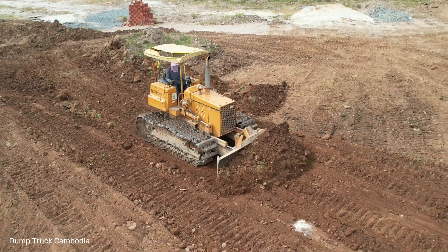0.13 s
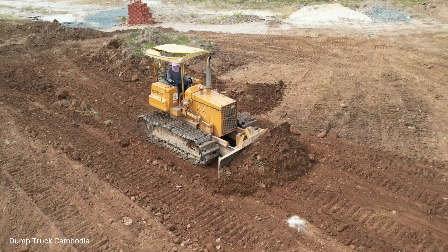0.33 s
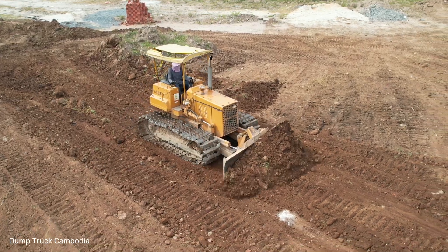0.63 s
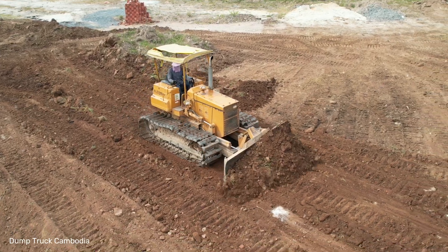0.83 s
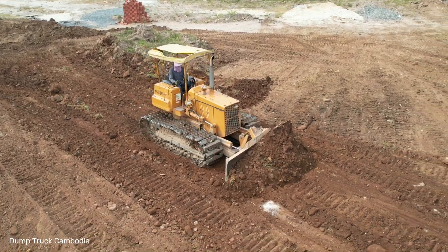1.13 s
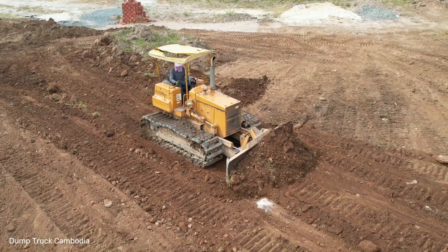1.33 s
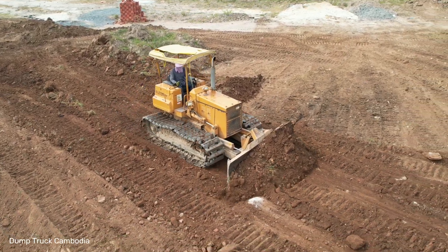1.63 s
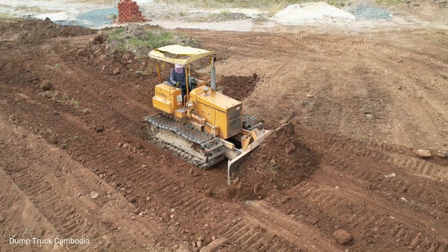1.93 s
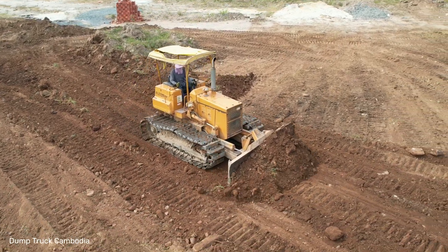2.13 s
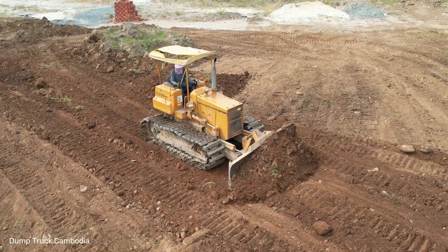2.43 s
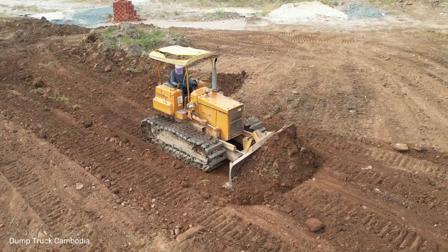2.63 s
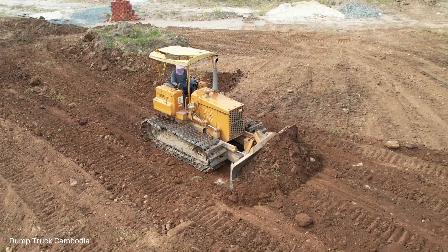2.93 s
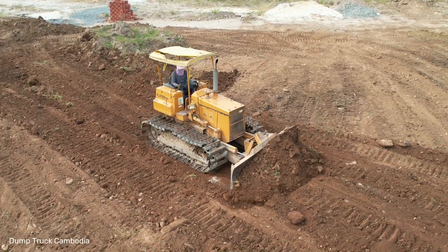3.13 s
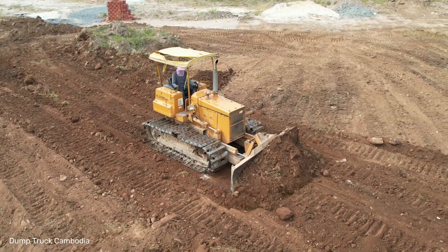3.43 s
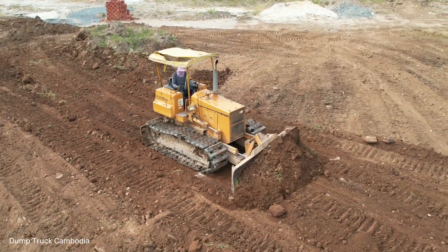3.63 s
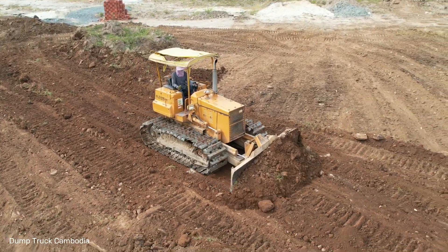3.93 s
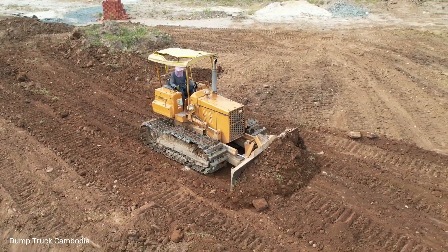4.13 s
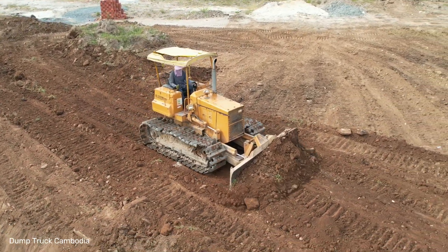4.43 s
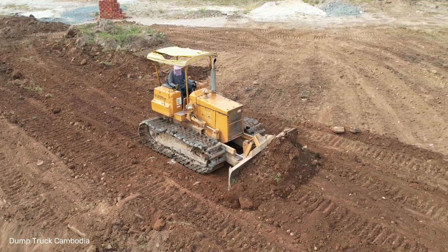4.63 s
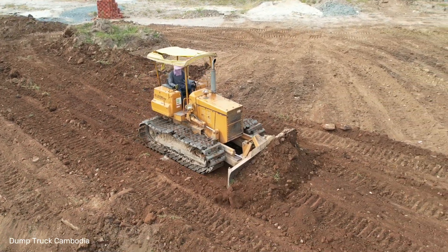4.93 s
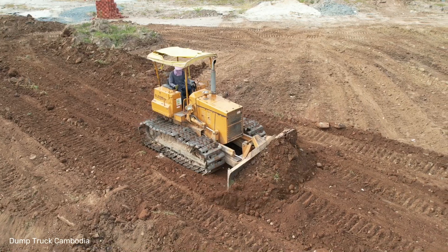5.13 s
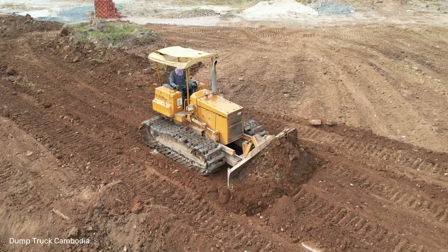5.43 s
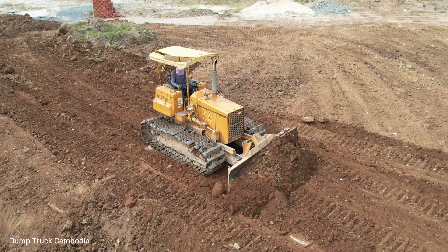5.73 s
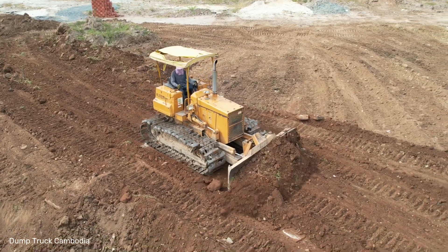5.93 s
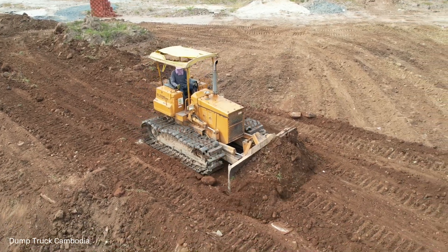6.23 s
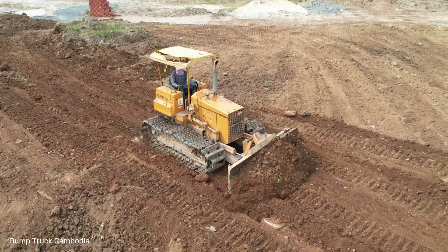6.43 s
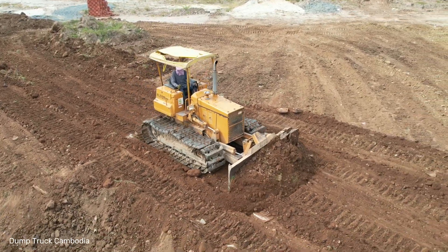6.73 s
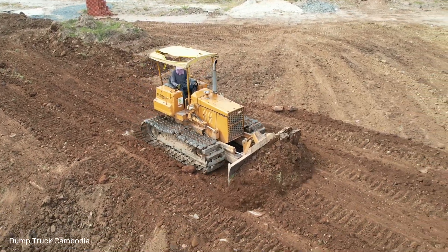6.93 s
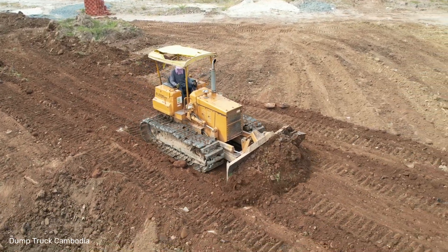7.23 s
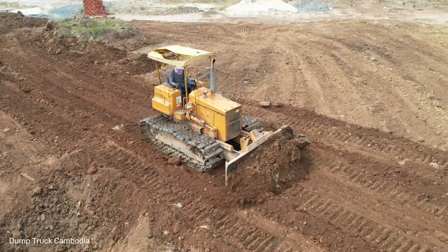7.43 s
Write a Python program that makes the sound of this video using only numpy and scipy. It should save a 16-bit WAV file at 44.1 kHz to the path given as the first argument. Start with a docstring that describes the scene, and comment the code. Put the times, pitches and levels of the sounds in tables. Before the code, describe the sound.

A bulldozer's diesel engine booms steadily under load while its steel tracks clank link by link, squeak now and then, and grind over soil outdoors.

```python
"""A four-cylinder diesel booms at the stack as a small crawler bulldozer pushes soil over open ground.
The boom (crankshaft orders) swells as the blade bites; with less load the engine runs lighter and faster.
Steel tracks clank link by link (ringing modes and grit noise) and dry pins squeak (wavering tones).
One roller, the hull and a hollow hum ring out; injectors rattle, soil grinds and stones crack.
One microphone channel takes it all in, with a faint tail from hull and ground behind the squeaks."""
import sys
import numpy as np
from scipy import signal
from scipy.fft import rfft, irfft, next_fast_len
from scipy.io import wavfile
from scipy.ndimage import map_coordinates

SR = 44100
rng = np.random.default_rng(int(sys.argv[2]) if len(sys.argv) > 2 else 0)


def master(y):
    """Save y as 16-bit WAV."""
    cut = np.clip(np.atleast_2d(y).T, -1, 1)
    pcm = np.round(cut * 32767)  # scale
    wavfile.write(sys.argv[1], SR, pcm.astype(np.int16))


N = 333837

# links of the two tracks slapping down, unevenly as the slack shifts:
# (time [s], level [dB], rise [s])
LINK_CLANKS = [(0.059, -39.5, .015), (.225, -40.5, .02), (.385, -39.5, .025), (.572, -39, .025),
               (0.711, -35, 0.0049), (.915, -41, .008), (1.087, -38, 0.0069), (1.268, -42.5, .01),
               (1.45, -43, .02), (1.62, -34.5, .014), (1.82, -39.5, .02), (2.137, -42, .01),
               (2.216, -44, .02), (2.499, -41.5, .02), (2.622, -40, .012), (2.803, -38, .025),
               (2.861, -40.5, .015), (2.961, -42, .01), (3.125, -44, .012), (3.68, -42.5, .015),
               (4.69, -40, .04), (4.913, -45.5, .006), (5.025, -39, .02), (5.145, -39, .03),
               (5.236, -39, .03), (5.402, -38.5, .02), (5.529, -38, .035), (5.684, -34, .003),
               (5.845, -38, .02), (5.897, -37.5, .015), (6.02, -41, .015), (6.106, -36.3, .003),
               (6.15, -39.5, .015), (6.298, -32.5, 0.0078), (6.59, -34, .015), (6.617, -35, .005),
               (6.855, -39, .015), (6.895, -38, .008), (7.004, -39.5, .003), (7.189, -39.5, .02),
               (7.425, -43, .02)]
# what a track shoe rings with: (frequency [Hz], level [dB], t60 [s])
SHOE_MODES = [(627.6, -5, 0.47), (966, -1.5, 0.35), (1396, -0.5, 0.62), (1518, -5.5, 0.11),
              (1805, -5, 0.26), (2420, -20.5, 0.21), (3620, -15, 0.2)]
# loose pins and bushings jingle: level of the steady bed, and level against each clank
JINGLE_DB, JINGLE_CLANK_DB = -49, -4


def amp(db):
    """Decibels to gain."""
    return 10 ** (np.asarray(db) / 20)


def unit(x):
    """x at rms 1."""
    return x / np.sqrt(np.mean(x ** 2) + 1e-20)


def curves(rows):
    """One value per sample for each column after the time."""
    s, *cols = np.transpose(rows)
    return [np.interp(np.arange(N) / SR, s, c) for c in cols]


def wobble(rate, size=N):
    """A smooth random curve, rate knots a second."""
    knots = rng.standard_normal(int(size * rate / SR) + 4)
    return map_coordinates(knots, [np.arange(size) * rate / SR])


def coloured(x, points):
    """x through a causal body with this (Hz, dB) response; white noise keeps its power."""
    m = next_fast_len(N + SR)
    hz, db = np.transpose(points)
    bins_hz = np.fft.rfftfreq(m, 1 / SR)
    gain = unit(amp(np.interp(np.log(bins_hz + 1), np.log(hz), db)))
    # folding the cepstrum makes the response minimum phase
    cepstrum = irfft(np.log(np.maximum(gain, 1e-6)), m)
    cepstrum[1:m // 2] *= 2
    cepstrum[m // 2 + 1:] = 0
    response = np.exp(rfft(cepstrum))
    return irfft(rfft(x, m) * response, m)[:N]


def add(track, s, sound):
    """Mix a sound into the track at time s."""
    start = max(round(s * SR), 0)
    part = track[start:start + len(sound)]
    part += sound[:len(part)]


def grit(rate, spread_db, t60):
    """Noise of rms 1 made of tiny contacts, rate a second, each starting at once and dying away."""
    when, size = rng.random((int(rate * N / SR), 2)).T
    power = amp(-spread_db * np.log(np.maximum(size, .01))) ** 2
    contacts = np.bincount((when * N).astype(int), power, N)
    decay = amp(-60 / (t60 * SR)) ** 2
    fading = signal.lfilter([1], [1, -decay], contacts)
    return unit(rng.standard_normal(N) * np.sqrt(fading))


def pings(rate, t60, spread_db, detune):
    """Small steel contacts at rms 1: each briefly rings one mode of a shoe, a little off pitch."""
    t = np.arange(SR // 20) / SR
    when, which, size, off = rng.random((int(rate * N / SR), 4)).T
    hz, db, _ = np.array(SHOE_MODES)[(which * len(SHOE_MODES)).astype(int)].T
    hz = hz * (1 + detune * (2 * off - 1))
    gain = amp(db - spread_db * np.log(np.maximum(size, .03)))
    grains = gain[:, None] * np.sin(2 * np.pi * hz[:, None] * t) * amp(-60 * t / t60)
    at = (when * N).astype(int)[:, None] + np.arange(len(t))
    return unit(np.bincount(at.ravel(), grains.ravel(), N)[:N])


def firing_rate():
    """Firing rate in Hz at each sample: the engine sags as the blade bites."""
    # engine speed: (time [s], firing rate [Hz])
    engine_speed = [(0, 66.4), (.5, 66.2), (.82, 63.96), (1.6, 63.37), (1.9, 67.25), (2.12, 65.67),
                    (2.39, 69.06), (2.48, 67.78), (3.2, 67.12), (3.88, 65.66), (3.98, 68.9), (4.4, 69.94),
                    (5.08, 65.87), (5.3, 69.77), (5.68, 68.75), (6.2, 68.54), (7.07, 69.1), (7.16, 67.4),
                    (7.35, 68.6)]
    firing_hz, = curves(engine_speed)
    return firing_hz


def crank():
    """Crankshaft turns so far: four cylinders fire twice a turn, never quite evenly."""
    return np.cumsum(firing_rate() / 2) / SR + 0.0033 * wobble(30)


def load():
    """Engine load, 0 free to 1 full: the governor lets the speed sag in step with it."""
    free_hz, full_sag_hz = 70, 6.5
    return np.maximum((free_hz - firing_rate()) / full_sag_hz, .01)


def exhaust(turns):
    """Firing pulses boom at the stack; their uneven sizes and gas turbulence burble in the muffler."""
    # overtones of the boom: (crankshaft order [multiple], level against the boom [dB])
    boom_overtones = [(5, -29), (6, -13.5), (10, -29), (14.4, -40.5)]
    # orders of the crankshaft and its geared drives, at any load: (order [multiple], level [dB])
    shake_orders = [(1, -37.5), (3, -48.5), (4.7, -47)]
    # exhaust pipe and muffler: (frequency [Hz], response [dB per Hz])
    muffler_body = [(12, -36), (24, -2.5), (36, -4.5), (50, 4.5), (80, 0), (115, -3), (165, -4.5),
                    (210, -7.5), (290, -11.5), (400, -24.5), (700, -44.5), (2000, -96.5)]
    # strength of the gas turbulence in the muffler: (time [s], level [dB])
    burble_level = [(0, -31.5), (.6, -30.5), (.8, -34.5), (2.4, -32.5), (3.9, -33.3), (4.4, -36.5),
                    (5.22, -30.5), (5.45, -31), (7.05, -30.5), (7.23, -28.5), (7.57, -30)]
    # the boom's ceiling, and how quickly rising load brings it there
    ceiling_db, growth = -21, 1.12
    # the drone with no load, and its rise at full load
    drone_free_db, drone_load_db = -37, 7

    def tone(order):
        """One crankshaft order at rms 1."""
        return -np.sqrt(2) * np.cos(2 * np.pi * order * turns)

    effort = load()
    boom_db = ceiling_db + 20 * np.log10(np.tanh(growth * effort))
    # a heavier load steepens each pulse, so the overtones grow fastest
    edge = amp(.5 * (boom_db - boom_db.max()))
    overtones = np.zeros(N)
    for order, db in boom_overtones:
        # the high overtones come and go most
        level = amp(db + .2 * order * wobble(3.5))
        # the pipe delays each overtone by a different part of a cycle
        cycles = order * turns + rng.random()
        overtones += level * np.sqrt(2) * np.sin(2 * np.pi * cycles)
    boom = amp(boom_db + .5 * wobble(20)) * (tone(2) + edge * overtones)

    drone_db = drone_free_db + drone_load_db * effort
    drone = amp(drone_db + 0.3 * wobble(10)) * tone(4)
    shake = sum(amp(db + 2.5 * wobble(8.5)) * tone(order) for order, db in shake_orders)

    # turbulence surges once per firing
    puffs = unit(rng.standard_normal(N) * amp(3.1 * np.cos(4 * np.pi * turns)))
    burble_db, = curves(burble_level)
    burble = amp(burble_db + wobble(10)) * coloured(puffs, muffler_body)
    return boom + drone + shake + burble


def halt():
    """How far the machine has slowed, 0 crawling to 1 at the depth of the pause between two crawls."""
    start_s, end_s = 3.804, 5.093
    progress = np.interp(np.arange(N) / SR, (start_s, end_s), [0, 1])
    return np.sin(np.pi * progress)


def rattle(turns):
    """Injectors and valves knock in step with the crankshaft and ring in the hull; loose steel jingles."""
    # engine block and hull: (frequency [Hz], response [dB per Hz])
    hull_body = [(150, -13.5), (420, -1), (700, 4.5), (1020, -2), (1160, -7.5), (1300, 6), (1400, 3.5),
                 (1500, 5), (1680, -2), (2400, -4.5), (2850, -20), (3700, -13.5), (4250, -19),
                 (4650, -29.5), (6000, -29), (9500, -39.5), (15500, -52.5)]
    crawl_db, pause_dip_db = -42.5, -5
    dip_db = pause_dip_db * halt()
    # four strokes a turn, of uneven strength
    strokes = np.diff(np.floor(4 * turns), prepend=0)
    knock = unit(strokes * amp(2.5 * rng.standard_normal(N)))
    chatter = unit(grit(rate=650, spread_db=1.4, t60=.04) + amp(-9) * knock)
    # the jingle sinks twice as many dB in the pause
    jingle = amp(JINGLE_DB + 2 * dip_db) * pings(rate=420, t60=.04, spread_db=2, detune=.07)
    return amp(crawl_db + dip_db + wobble(20)) * coloured(chatter, hull_body) + jingle


def tracks():
    """Each link grinds down onto the ground, rings, and sets its neighbours jostling."""
    # track chain and rollers: (frequency [Hz], response [dB per Hz])
    steel_body = [(200, -26), (450, -4), (680, -16), (980, 3), (1160, -2), (1400, 11.5), (1700, 0),
                  (2450, 2), (2900, -16), (3900, -9.5), (4900, -31), (9000, -39), (11000, -53.5),
                  (15500, -51.5)]
    jostle_t60 = .21  # s
    t = np.arange(SR // 2) / SR
    power, ring = np.zeros(N), np.zeros(N)
    for s, db, rise_s in LINK_CLANKS:
        # the slack takes up just before the blow
        rise = np.minimum(t / rise_s, 1) ** 2
        after = np.maximum(t - rise_s, 0)
        start = s - .7 * rise_s
        add(power, start, (rise * amp(db - 60 * after / jostle_t60)) ** 2)
        for hz, mode_db, t60 in SHOE_MODES:
            # no two shoes are quite alike
            strength, detune, phase = rng.standard_normal(3)
            mode = np.sin(2 * np.pi * (hz * (1 + 0.03 * detune) * t + phase))
            # the ring lies 8.5 dB under the blow
            level_db = db - 8.5 + mode_db + 2 * strength
            add(ring, start, rise * amp(level_db - 60 * after / t60) * mode)
    blows = np.sqrt(power)
    jostle = amp(JINGLE_CLANK_DB) * blows * pings(rate=420, t60=.035, spread_db=2, detune=.09)
    clank = coloured(blows * grit(rate=900, spread_db=1.4, t60=.025), steel_body)
    return ring + jostle + clank


def squeaks():
    """A dry pin sticks and slips on one resonance: a wavering tone, hoarse when slips fall out of step."""
    # a brief ring of a roller at the start, then squeals and groans of dry track pins: # (middle [s], length
    # [s], pitch [Hz], level [dB], roughness [0-1])
    pin_squeaks = [(.005, 0.024, 1730, -41, .05), (0.109, 0.067, 8540, -56, 0.25),
                   (0.312, 0.11, 5280, -59.5, 0.2), (0.5, 0.19, 5140, -60, 0.45),
                   (1.835, 0.075, 3440, -49.5, 0.1), (2.635, 0.13, 5060, -52.5, 0.24),
                   (2.736, 0.055, 8640, -59.5, 0.29), (2.807, 0.072, 3970, -44, 0.24),
                   (2.862, 0.081, 4090, -42, 0.4), (2.911, 0.11, 3927, -40.5, 0.9),
                   (3.89, 0.086, 6120, -55.5, 0.65), (5.299, 0.056, 5160, -53.5, 0.54),
                   (5.479, 0.027, 5234, -49, 0.2), (5.768, 0.059, 5000, -63, 0.4),
                   (5.91, 0.089, 6220, -51, 0.57), (5.933, 0.032, 5167, -48.5, 0),
                   (6.242, 0.062, 5000, -49, 0.2), (6.375, .05, 4950, -61, .4),
                   (6.459, 0.068, 6230, -48, 0.2), (6.545, 0.1, 4850, -59.5, .6),
                   (6.621, 0.13, 3900, -52, 0.84), (7.002, .3, 1010, -45, 0.87),
                   (7.115, 0.1, 6640, -51.5, 1), (7.44, .25, 1000, -47.5, 1)]
    out = np.zeros(N)
    for s, length, hz, db, rough in pin_squeaks:
        size = int(max(length, .02) * SR)
        waver = .006 * wobble(45, size) + .012 * rough * wobble(200, size)
        phase = 2 * np.pi * np.cumsum(hz * (1 + waver)) / SR
        width_hz = .15 * hz
        slips = (wobble(width_hz, size) + 1j * wobble(width_hz, size)) / np.sqrt(2)
        share = np.clip(rough, 0, 1)
        voice = (np.sqrt(1 - share ** 2) + share * slips) * np.exp(1j * phase)
        swell = signal.windows.tukey(size, .85) * amp(db + 2 * wobble(150, size))
        # the steel radiates less and less of the octave as the pitch climbs
        octave = amp(-18) / (1 + (hz / 5500) ** 12) * voice ** 2 / abs(voice)
        add(out, s - length / 2, swell * (voice + octave).real * np.sqrt(2))
    return out


def scattered(x, t60, db):
    """x with the faint tail that the hull and the rough ground throw back."""
    t = np.arange(SR // 2) / SR
    tail = rng.standard_normal(len(t)) * amp(-60 * t / t60)
    return x + amp(db) * signal.fftconvolve(x, tail / np.linalg.norm(tail))[:N]


def note(s, hz, db, rise_s, t60):
    """One resonance of the machine swells and rings out."""
    t = np.arange(SR) / SR
    swell = np.minimum(t / rise_s, 1) ** 2 * amp(db - 60 * np.maximum(t - rise_s, 0) / t60)
    out = np.zeros(N)
    add(out, s, swell * np.sin(2 * np.pi * hz * t + .2 * wobble(150, len(t))))
    return out


def whine():
    """A gear mesh in the drive, geared to the engine speed, sings briefly as the load comes off."""
    # (time [s], level [dB])
    whine_db, = curves([(3.6, -80), (3.95, -48), (4.15, -47), (4.3, -60), (5, -72)])
    mesh_hz = 21.5 * firing_rate()
    mesh = np.sin(2 * np.pi * np.cumsum(mesh_hz) / SR + 0.2 * wobble(60))
    return amp(whine_db) * mesh


def pressing():
    """Near 1 while a link presses into the soil, 0 between links."""
    lag_s, press_s = 0.01, 0.093  # lag of the press's middle behind the clank, and its length
    times = np.array(LINK_CLANKS)[:, 0] + lag_s
    landed = np.bincount((times * SR).astype(int), minlength=N)[:N]
    press = signal.windows.hann(int(press_s * SR))
    return np.tanh(2 * signal.fftconvolve(landed, press, "same"))


def scrape():
    """Soil and grit grind and chink in the chain as the machine picks up pace, swelling at each link."""
    # between presses: (time [s], level [dB])
    grind_db, = curves([(4.97, -66), (5.03, -52), (6.6, -49)])
    # soil against steel: (frequency [Hz], response [dB per Hz])
    sand = [(300, -10.5), (620, 15.0), (1000, 10.0), (1170, -1.0), (2100, 13.5), (3100, -6),
            (3750, 0.5), (4500, -4.5), (5500, -27), (6300, -20.5), (7500, -33.5), (9000, -19),
            (12000, -42.5)]
    swell_db = 3.5
    grains = coloured(grit(rate=150, spread_db=2.5, t60=.035), sand)
    chinks = amp(-2) * pings(rate=90, t60=.085, spread_db=2, detune=.14)
    return amp(grind_db + swell_db * pressing()) * (grains + chinks)


def ticks(count):
    """Each stone gives one short dry crack; crumbs tick faintly in between; both sink in the pause."""
    # stones cracking under the shoes, before the sinking: (time [s], level [dB])
    stone_cracks = [(.709, -54.5), (5.011, -54), (6.028, -50), (6.297, -46), (6.616, -50)]
    t = np.arange(SR // 25) / SR
    out = np.zeros(N)
    crumbs = [(u * N / SR, -67 + 10 * v) for u, v in rng.random((count, 2))]
    for s, db in list(stone_cracks) + crumbs:
        add(out, s, amp(db - 60 * t / 0.045) * rng.standard_normal(len(t)))
    # (frequency [Hz], response [dB per Hz])
    dry_crack = [(1500, 3), (4000, 2), (9000, -9), (15000, -20)]
    return coloured(out, dry_crack) * amp(-5 * halt())


def scene():
    """Engine, running gear and soil, heard in the open."""
    turns = crank()
    engine = exhaust(turns) + rattle(turns)
    shrill = scattered(squeaks(), t60=.35, db=-10)
    roller = note(s=3.533, hz=1430, db=-26.0, rise_s=0.023, t60=0.17)
    hull_thud = note(s=1.595, hz=166, db=-26.5, rise_s=0.018, t60=0.2)
    hollow_hum = note(s=3.3, hz=312, db=-38, rise_s=0.095, t60=0.74)
    gear = tracks() + shrill + roller + hull_thud + hollow_hum + whine()
    soil = scrape() + ticks(count=45)
    return (engine + gear + soil)[None]


def record(dry):
    """The recorder eases in and out and keeps next to nothing above its band limit."""
    top_hz = 15700
    eased = dry * signal.windows.tukey(N, .001)
    band_limit = signal.ellip(12, .1, 90, top_hz, fs=SR, output="sos")
    return signal.sosfilt(band_limit, eased)


dry = scene()
out = record(dry)
master(out)
```